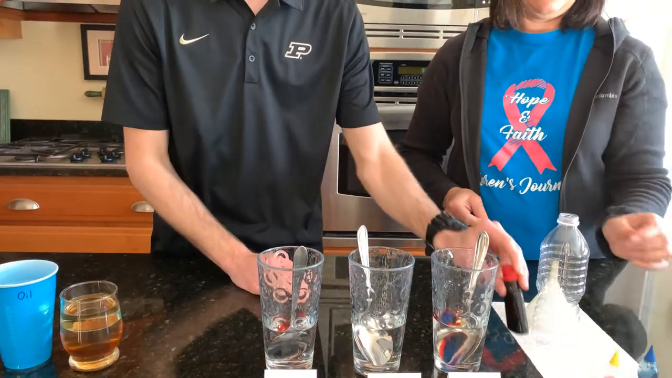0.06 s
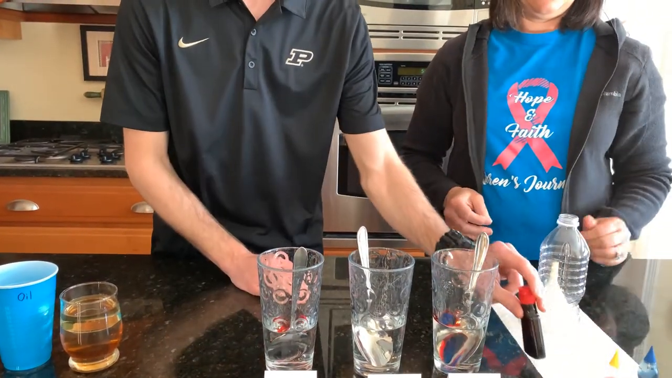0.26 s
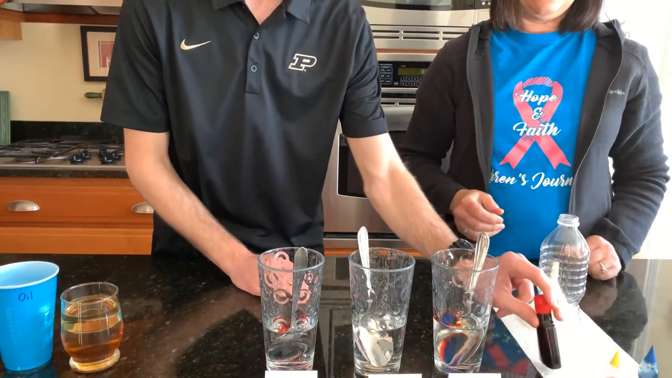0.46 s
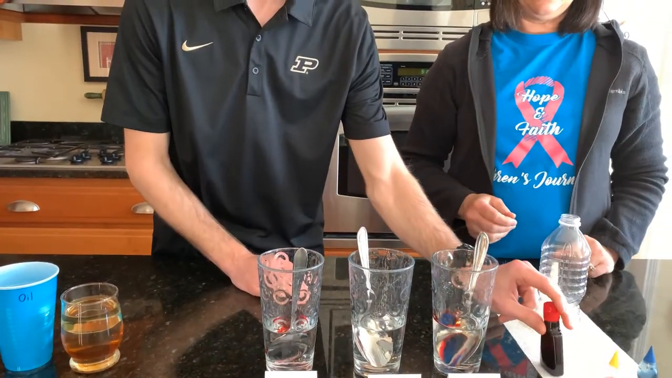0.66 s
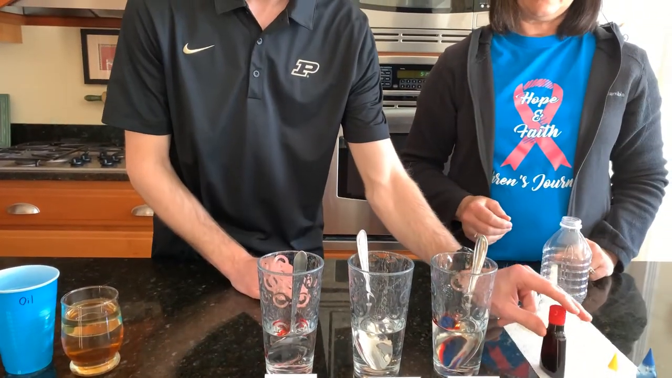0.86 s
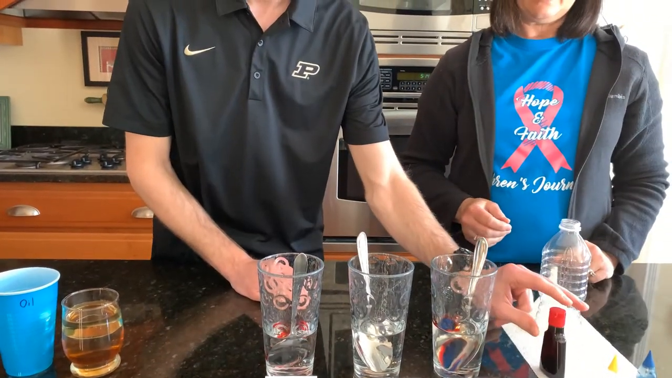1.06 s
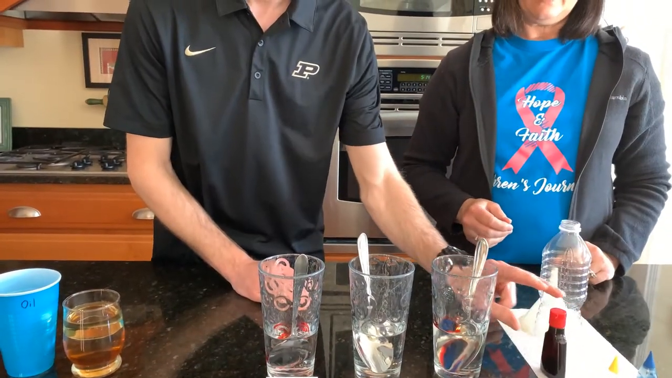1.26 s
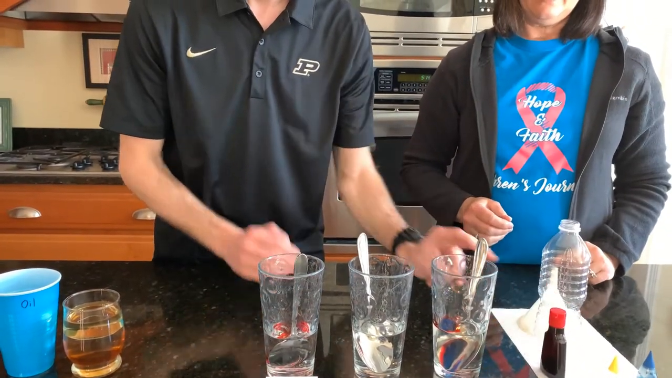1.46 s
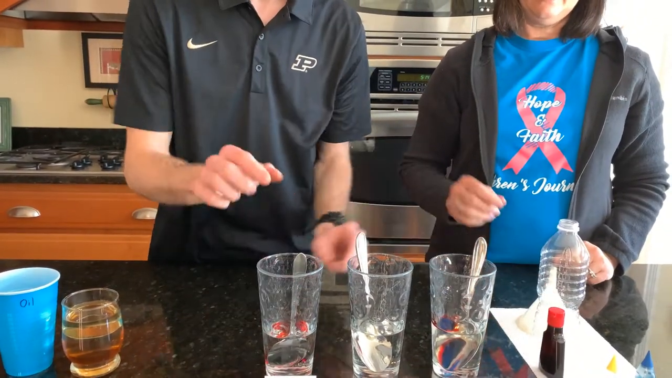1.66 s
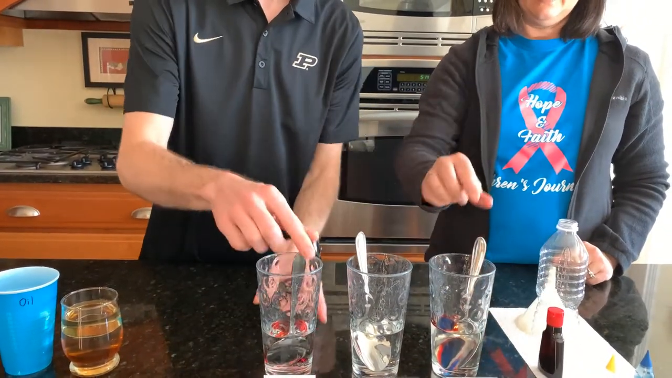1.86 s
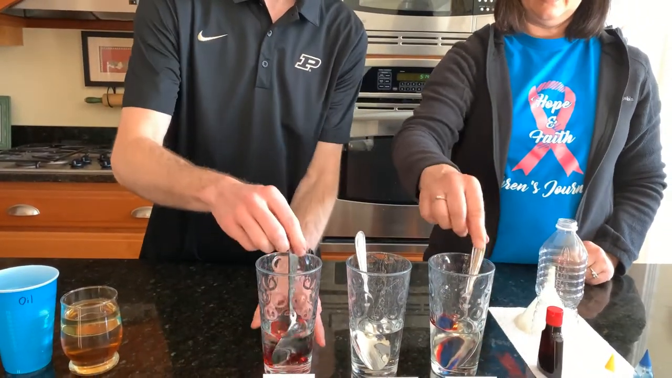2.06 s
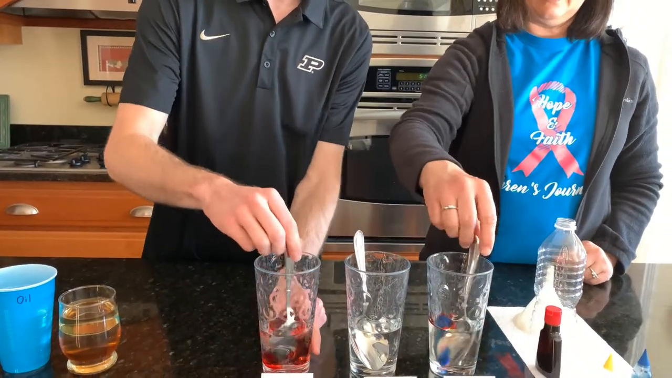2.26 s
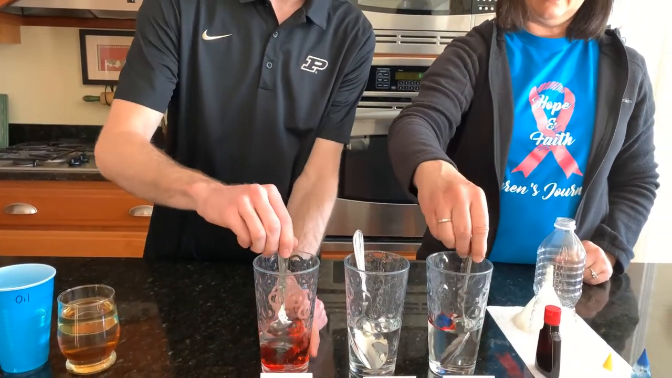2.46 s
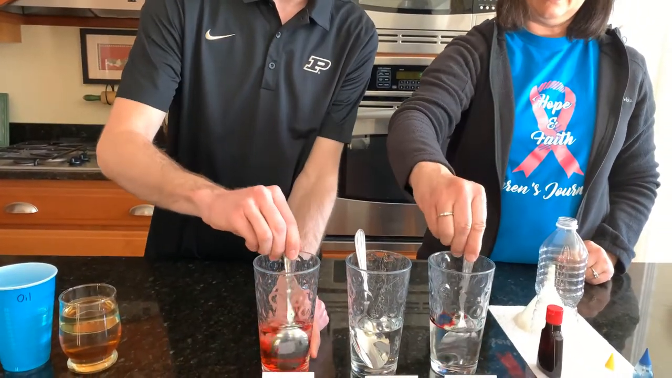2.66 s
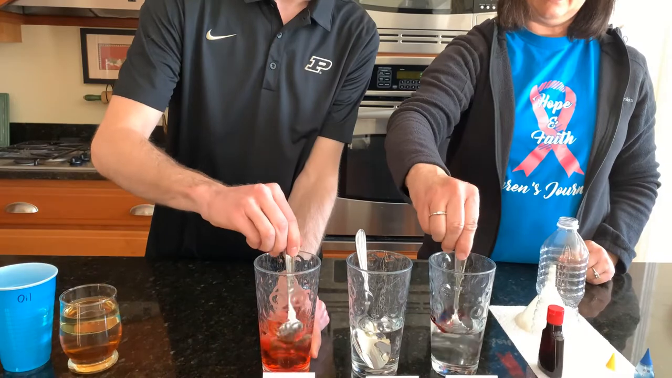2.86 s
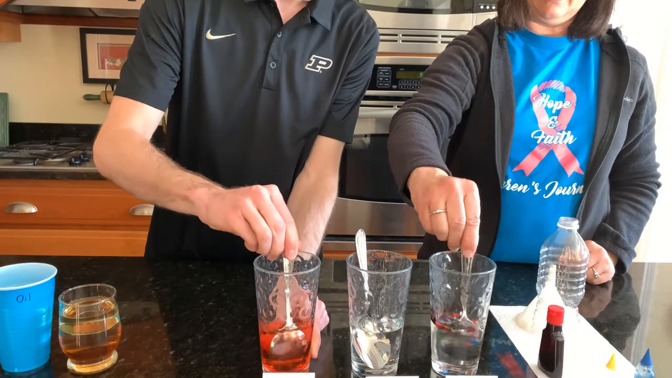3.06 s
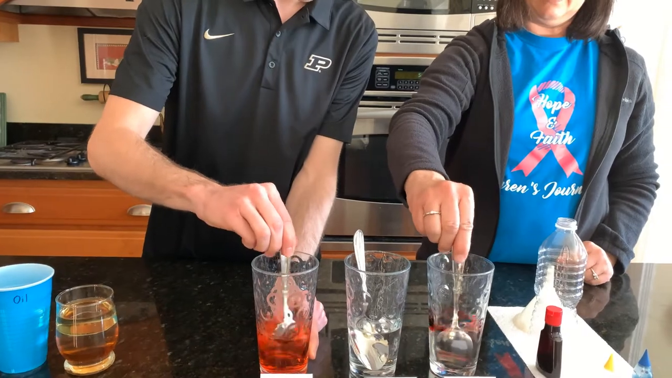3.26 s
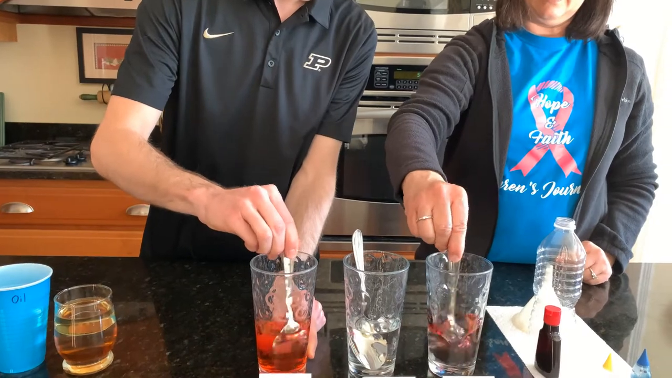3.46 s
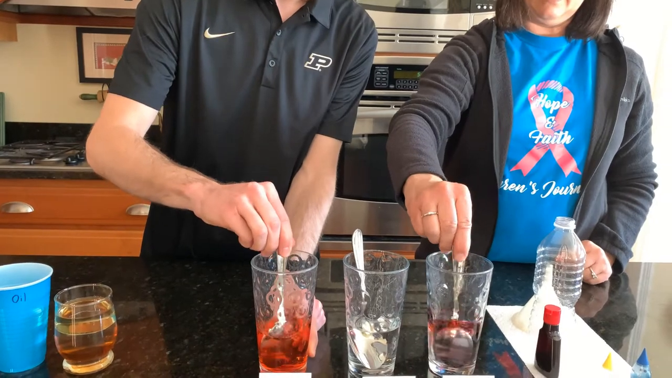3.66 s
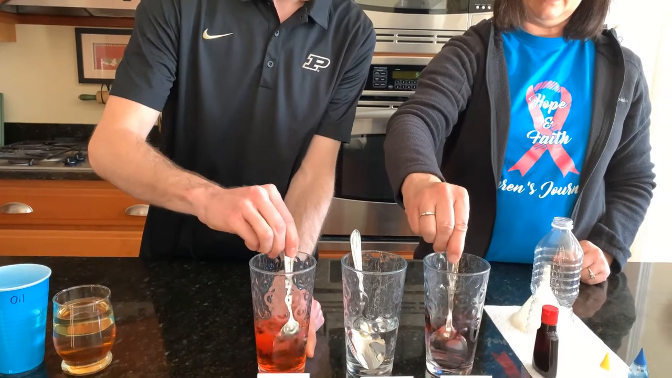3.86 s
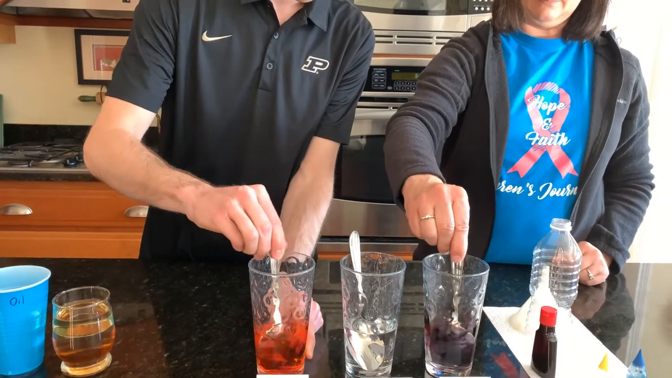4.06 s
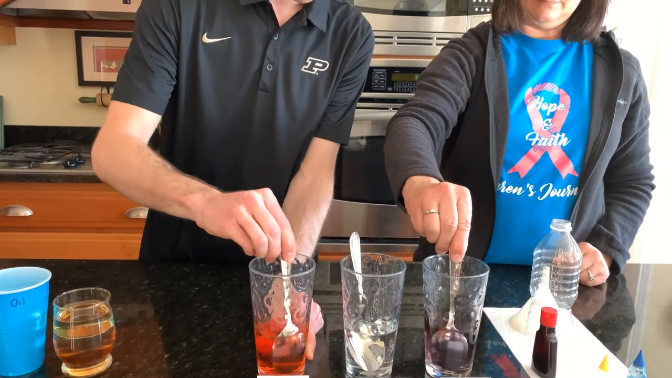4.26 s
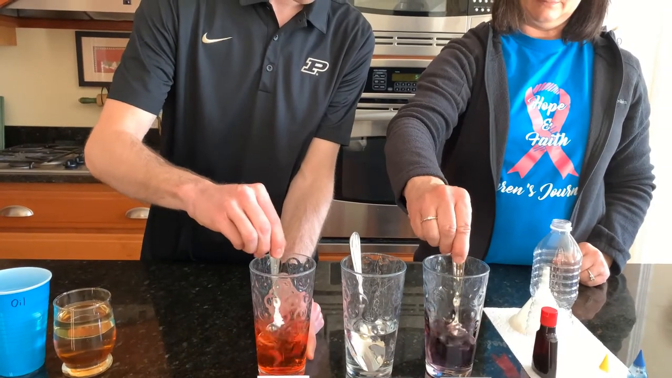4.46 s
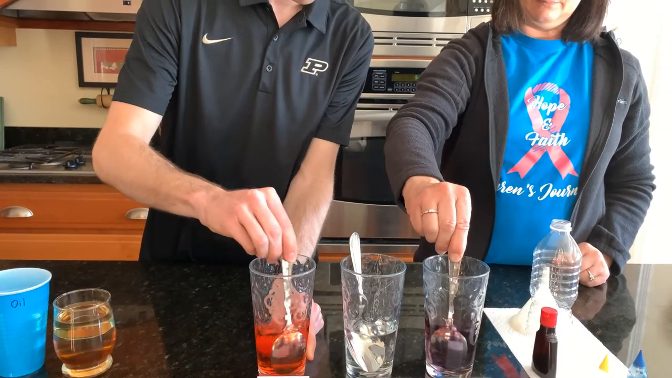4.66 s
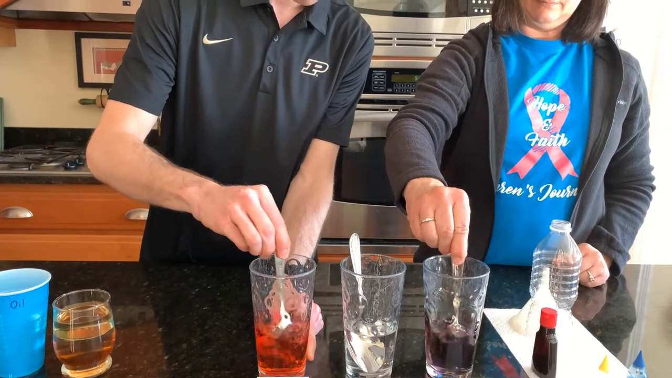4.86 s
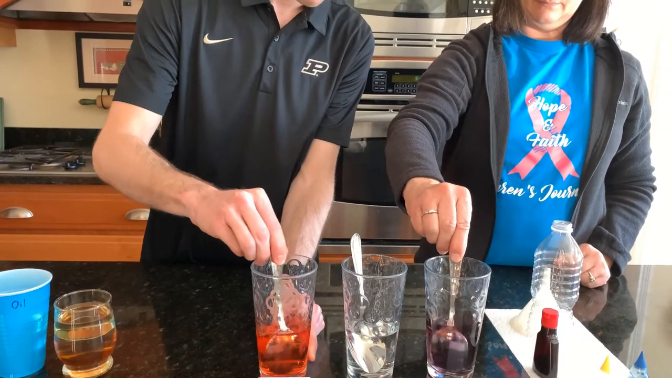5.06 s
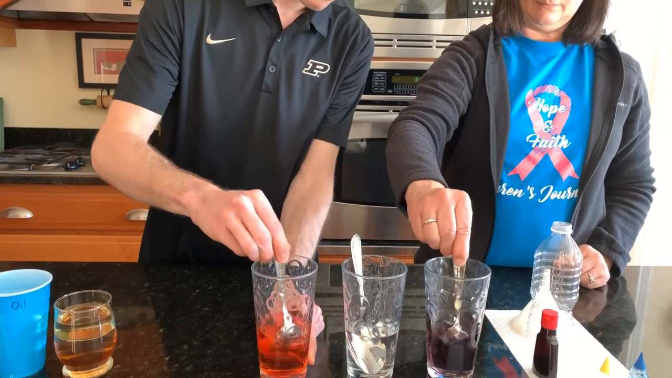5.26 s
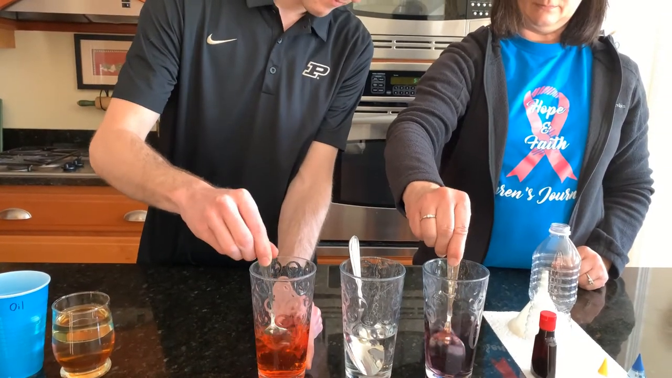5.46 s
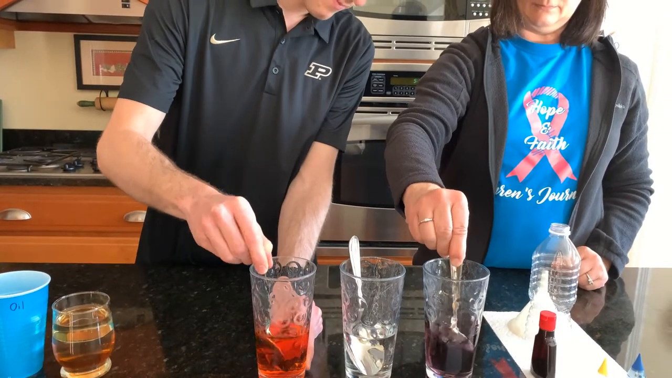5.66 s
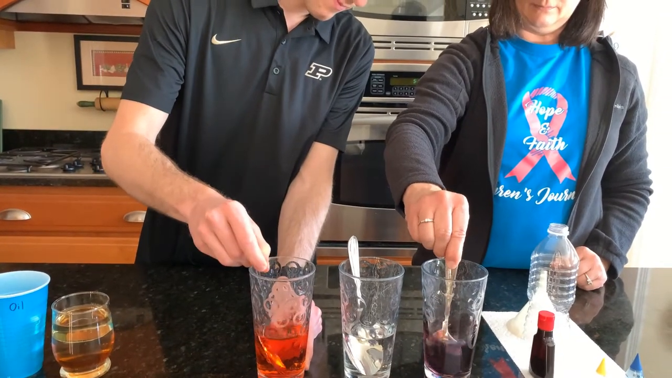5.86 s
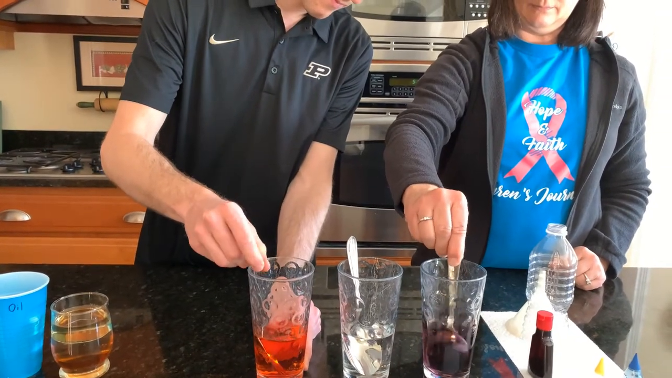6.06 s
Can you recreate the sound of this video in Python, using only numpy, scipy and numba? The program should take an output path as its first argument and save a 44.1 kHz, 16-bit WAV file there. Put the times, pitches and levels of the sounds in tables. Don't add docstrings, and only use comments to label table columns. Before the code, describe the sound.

Quiet room tone first, with slight cloth and plastic rustling. Then spoons begin tapping in two thick drinking glasses: a medium clink, a few lighter ones, then hard ringing knocks at quickening intervals with irregular grazes. Each is crisp and glassy with a short rattle and a faint singing spoon handle. Water swirls and gurgles underneath. Indoors at a kitchen counter, recorded about a metre away, continuing to the end.

```python
import sys
import numpy as np
from scipy import signal
from scipy.fft import rfft, irfft, next_fast_len
from scipy.io import wavfile
from scipy.ndimage import uniform_filter1d
from numba import njit

SR = 44100
rng = np.random.default_rng(int(sys.argv[2]) if len(sys.argv) > 2 else 0)


def int16_out(signal):
    q = np.round(np.clip(np.atleast_2d(signal).T, -1, 1) * 32767)
    wavfile.write(sys.argv[1], SR, q.astype(np.int16))


def attenuation_scalar(level_db):
    decades = np.asarray(level_db, float) / 20
    return 10 ** decades


N = 270009

# [s, dB, dB, Hz, dB]
BLOWS = [(2.3629, -21, -33, 10300, -38), (3.0081, -10, -22.5, 9580, -55), (3.5906, -9, -20.5, 9630, -28),
         (4.0862, -8, -25.5, 9630, -22), (4.5333, -9, -17.5, 9740, -25.5), (4.9267, -8, -22.5, 10300, -39),
         (5.3273, -12, -23, 9610, -18.5), (5.6889, -9.5, -26.5, 10300, -26.5),
         (6.052, -13, -29, 10300, -27)]
# [s, dB, Hz, dB, dB]
GRAZES = [(2.9371, -41.5, 4765, -38.5, -52), (3.2936, -36.5, 4620, -20.5, -35), (3.84, -41, 4560, -40, -60),
          (4.2683, -31.5, 4490, -25.5, -33.5), (4.2941, -25.5, 4740, -25, -29.5),
          (4.4284, -32, 4760, -35, -51), (4.7013, -33, 4490, -30.5, -31),
          (4.743, -25.5, 4680, -26.5, -30.5), (5.1575, -42, 4520, -30.5, -62), (5.227, -35, 4690, -34, -27),
          (5.4919, -30, 4500, -29, -36.5), (5.5572, -36.5, 4590, -37, -40.5),
          (5.7776, -28, 4650, -31, -32.5), (5.8375, -25, 4576, -22.5, -26),
          (5.9468, -31.5, 4720, -37.5, -41)]
# [s, dB, Hz, dB, dB]
TAPS = [(2.4774, -15, 4855, -17, -44.5), (2.6774, -42.5, 4920, -53, -62.5),
        (2.7609, -26, 4768, -26.5, -49.5), (2.9987, -20.5, 4800, -34, -54),
        (3.1949, -25, 4814, -29.5, -50.5), (3.3879, -22, 4890, -24.5, -43.5),
        (3.4196, -33, 4890, -44, -44.5), (3.5565, -30, 4825, -28, -62), (3.7286, -17.5, 4810, -21, -40.5),
        (3.7774, -34, 4870, -34, -43), (3.913, -25, 4790, -24.5, -40.5), (4.0867, -17.5, 4860, -46, -40.5),
        (4.5344, -17, 4867, -40, -41), (4.8505, -32.5, 4780, -40, -53), (4.9921, -19.5, 4804, -12, -53),
        (5.105, -28.5, 4754, -21, -51.5), (5.4465, -14.5, 4800, -30, -41), (6.0063, -30, 4870, -36, -63)]
# [Hz, dB, s]
NEAR_GLASS_MODES = [
    [(4332, -26, .3), (4553, -16, .12), (4834, -16, .1), (5260, -15, .033), (4712, -17, .28),
     (4270, -14, .017)],
    [(7520, -9, .06), (7602, -5, .12), (7280, -12, .073), (7830, -19.5, .066), (8390, -15, .1)],
    [(9628, -3.5, .1), (9840, -8, .04), (10295, -4, .08), (10530, -7, .15), (10900, -10, .058),
     (11330, -8, .06)],
    [(11950, -2.5, .12), (12330, -7, .12), (12710, -7, .12), (15130, 3, .09), (14220, 3, .1),
     (15400, -5, .099)],
]
FAR_GLASS_MODES = [
    [(4100, -33, 0.11), (4940, -16, 0.088), (4570, -28, .18), (5400, -20.5, 0.036), (3130, -18.5, 0.074)],
    [(7350, -4, 0.084), (6750, -18.5, 0.23), (7710, -20.5, 0.081), (7415, -1, 0.13), (8610, -20, 0.14)],
    [(9316, -14, .027), (9900, -8, .038), (9445, -10, .06), (10550, -8, .12), (11030, -12, .04),
     (11330, -18, .061)],
    [(13200, 0, 0.023), (12900, 0.5, 0.046), (14280, -11, .1), (14550, -12, 0.12), (14970, -1, 0.068),
     (15550, -8, .1)],
]
WALL_T60_S = [0.086, 0.045, 0.03]
# [Hz, s]
HANDLE_MODE = (1889, 0.5)
BOWL_MODE = (2385, 0.05)
# [s, dB, s]
FREE_RINGS = [(2.3623, -16, 0.02), (3.01, -24, .04), (4.0864, -18.5, 0.042), (4.924, -16.5, 0.047),
              (5.3252, -12, 0.036), (5.6917, -13, 0.044), (6.0513, -22, 0.03)]
# [Hz, dB per Hz]
CRACK_SPECTRUM = [(200, -42), (700, 6.5), (1500, 1), (2500, -1.5), (3500, -3.5), (4700, 0.5), (6300, -1.5),
                  (7500, -10), (8800, -4.5), (10300, 4.5), (12200, -4), (13400, -21), (14800, -0.5),
                  (16500, -43)]
# [s, dB, Hz]
THUDS = [(2.363, -43, 846), (2.477, -33, 864), (2.677, -41, 920), (2.761, -39.5, 696), (2.935, -36.5, 698),
         (3.011, -34, 860), (3.295, -32.5, 786), (3.39, -32, 727), (3.421, -36.5, 730), (3.557, -30.5, 825),
         (3.592, -20.5, 705), (3.73, -30.5, 875), (3.843, -36, 742), (3.912, -30.5, 1060),
         (4.088, -28, 650), (4.271, -44, 790), (4.431, -30, 720), (4.704, -33, 914), (4.742, -38, 754),
         (4.85, -29, 717), (4.927, -42, 677), (4.993, -40, 890), (5.23, -38, 1120), (5.327, -30.5, 1210),
         (5.446, -51, 865), (5.493, -38, 866), (5.69, -28, 719), (5.84, -50, 803), (5.947, -30, 719),
         (6.052, -30.5, 715)]
# [s, dB, Hz, s]
GULPS = [(3.696, -42, 856, 0.11), (4.049, -40.5, 780, .053), (4.508, -23.5, 857, 0.11),
         (5.263, -28, 700, 0.035), (5.515, -35, 898, 0.045)]
# [s, dB]
STIRRING = [(2.34, -63), (2.409, -79), (2.53, -69), (2.59, -54.5), (2.77, -55.5), (3.17, -52),
            (3.34, -56.5), (3.79, -49), (4.14, -57.5), (4.35, -51), (4.89, -49.5), (5.05, -71), (5.26, -41),
            (5.4, -49.5), (5.52, -57.5), (5.79, -52), (5.89, -49.5), (6.12, -48.5)]
# [Hz, dB]
SLOSH_BANDS = [(330, -2), (650, 1.0), (1150, 7), (1900, 2.5), (3200, -3), (5500, -2.5)]
# [Hz, s]
ROOM_T60_S = [(500, 0.28), (1300, 0.32), (3200, 0.34), (6500, 0.21), (12500, 0.12)]
# [Hz, dB]
DIFFUSE_SPECTRUM = [(200, 0), (3100, 0), (3550, -12), (4000, 0), (5550, 0), (5850, -26), (6550, -26),
                    (6850, 0), (8450, 0), (8900, -22), (9300, 0), (12500, -3), (13200, -28), (14000, 0)]
# [s, s, Hz, Hz, dB]
RUSTLES = [(.73, .06, 3600, 700, -84), (.725, .06, 6500, 1800, -80), (.73, .06, 9800, 900, -81),
           (.845, .03, 1700, 400, -79), (1.281, .055, 1000, 500, -66), (1.8, .39, 2400, 500, -86),
           (1.852, .24, 10500, 2000, -83), (.905, .002, 12500, 6000, -70), (4.51, .01, 8000, 13000, -52),
           (4.255, .03, 11500, 2500, -60), (4.765, .07, 4100, 500, -50), (4.76, .06, 3000, 400, -53),
           (5.842, .025, 2900, 700, -44)]
# [Hz, dB per Hz]
HUM_SPECTRUM = [(25, -16), (48, -7.5), (90, -9.5), (250, -8.5), (500, -19), (800, -26.5), (1500, -36.5),
                (4000, -41), (7800, -39.5), (8700, -41), (10800, -37.5), (12800, -46), (13500, -68),
                (15500, -61)]
# [Hz, Hz, dB, dB]
FRIDGE_TONES = [(119, 8.9, -67, -1), (145.1, 8.8, -66, 4.5), (597.4, 11.6, -80.5, 1.2)]

BLOW_HZ, BLOW_SECOND_HZ, BLOW_SECOND_DB, BLOW_PAN_DB = 4701, 7440, -22, -4
BLOW_HANDLE_DB, LOOSEN_DB_PER_S = -43.5, 1.5
GRAZE_SECOND_HZ, GRAZE_THIRD_HZ = 7230, 10530
GRAZE_HANDLE_DB, GRAZE_BOWL_DB, GRAZE_PAN_DB = -54.5, -47.5, -2.5
TAP_SECOND_HZ, TAP_THIRD_HZ = 7660, 9733
TAP_SECOND_DROP_DB, TAP_BOWL_DROP_DB, TAP_PAN_DB = -6.5, -29.5, -1.5
PLACE_SPREAD, PLACE_PAN_DB = .015, 2.1
TOP_SLOPE, TOP_DB = 0.81, -17.5
THUD_T60_S, THUD_LONGER_S_PER_DB = .05, .0004
FREE_T60_S, CHOKE_S = .3, .02
ROOM_DB, HUM_DB = -7, -64


def contacts():
    hits = []
    for start_s, wall_db, third_db, third_hz, bowl_db in BLOWS:
        handle_db = BLOW_HANDLE_DB + LOOSEN_DB_PER_S * (start_s - BLOWS[0][0])
        hits.append(dict(s=start_s, hz=[BLOW_HZ, BLOW_SECOND_HZ, third_hz],
                         db=[wall_db, BLOW_SECOND_DB, third_db],
                         handle=handle_db, bowl=bowl_db, pan=BLOW_PAN_DB, glass=NEAR_GLASS_MODES))
    place = rng.standard_normal((len(GRAZES + TAPS), 3))
    for (start_s, wall_db, wall_hz, second_db, third_db), c in zip(GRAZES, place):
        second_hz = GRAZE_SECOND_HZ * (1 + PLACE_SPREAD * c[0])
        third_hz = GRAZE_THIRD_HZ * (1 + 2 * PLACE_SPREAD * c[1])
        hits.append(dict(s=start_s, hz=[wall_hz, second_hz, third_hz], db=[wall_db, second_db, third_db],
                         handle=GRAZE_HANDLE_DB, bowl=GRAZE_BOWL_DB,
                         pan=GRAZE_PAN_DB + PLACE_PAN_DB * c[2], glass=NEAR_GLASS_MODES))
    for (start_s, wall_db, wall_hz, third_db, handle_db), c in zip(TAPS, place[len(GRAZES):]):
        hits.append(dict(s=start_s, hz=[wall_hz, TAP_SECOND_HZ, TAP_THIRD_HZ],
                         db=[wall_db, wall_db + TAP_SECOND_DROP_DB, third_db],
                         handle=handle_db, bowl=wall_db + TAP_BOWL_DROP_DB,
                         pan=TAP_PAN_DB + PLACE_PAN_DB * c[2], glass=FAR_GLASS_MODES))
    for hit in hits:
        hit["db"].append(TOP_DB + TOP_SLOPE * hit["db"][2])
    return sorted(hits, key=lambda hit: hit["s"])


def glass_walls(hits, scatter_db=4.0, detune=0.0011, port_lag_s=2.8e-5, lead_spread=1.0,
                burst_db=-6, burst_t60_s=0.07):
    rows = []
    for hit in hits:
        main_hz = hit["hz"]
        band_db = np.array(hit["db"]) + [-3.5, -2.5, 1.5, 4.0]
        modes = list(zip(main_hz, band_db, WALL_T60_S))
        modes.append((BOWL_MODE[0], hit["bowl"] + 3.0, BOWL_MODE[1]))
        modes += [(hz, db + burst_db, burst_t60_s) for hz, db in zip(main_hz, band_db)]
        for top_db, group in zip(band_db, hit["glass"]):
            for hz, db, t60_s in group:
                already_db = -25 * (20 < abs(hz - main_hz[0]) < 70)
                modes.append((hz, top_db + db + already_db, t60_s))
        chance = rng.standard_normal((len(modes), 3))
        chance[:7, :2] = chance[0, 2] = 0
        chance[4:7, 2] = chance[:3, 2]
        for (hz, db, t60_s), c in zip(modes, chance):
            lead = 2 * np.pi * hz * port_lag_s + lead_spread * c[2]
            rows.append((hit["s"], hz * (1 + detune * c[0]), t60_s, attenuation_scalar(db + scatter_db * c[1]),
                         attenuation_scalar(hit["pan"] / 4), lead))
    return ring(np.array(rows), 0.00042)


def free_ring(lead=0.76):
    rows = [(start_s, BLOW_HZ, FREE_T60_S, attenuation_scalar(level_db), attenuation_scalar(BLOW_PAN_DB / 4), lead)
            for start_s, level_db, _ in FREE_RINGS]
    t = np.arange(N) / SR
    gate = sum((t >= start_s) * (t < start_s + length_s) for start_s, _, length_s in FREE_RINGS)
    k = int(CHOKE_S * SR)
    choke = uniform_filter1d(1. * gate, k, origin=k // 2 - 1)
    return ring(np.array(rows), 0.00088) * np.maximum(gate, choke)


def cracks(hits, crack_db=-7, fast_s=0.0043, rattle_s=0.049):
    blows = np.zeros(N)
    for hit in hits:
        blows[int(hit["s"] * SR)] = attenuation_scalar(np.dot([0.2, 0.52, 0.16, 0.04], hit["db"]) + crack_db)
    blows = uniform_filter1d(blows, size=40, origin=-20)

    def fade(tau_s):
        return signal.lfilter([1], [1, -np.exp(-1 / (tau_s * SR))], blows)

    noise = level(colour(pair(0.42), CRACK_SPECTRUM), 0)
    rattle = colour(noise, DIFFUSE_SPECTRUM) * attenuation_scalar(-14.0 + 5.9 * walk(70)) * fade(rattle_s)
    return noise * fade(fast_s) + rattle


def base_thuds(over_db=-11):
    thuds = list(GULPS)
    for start_s, peak_db, pitch_hz in THUDS:
        thuds.append((start_s, peak_db, pitch_hz, THUD_T60_S - THUD_LONGER_S_PER_DB * (peak_db + 21.5)))
    chance = rng.standard_normal((len(thuds), 3))
    rows = []
    for (start_s, peak_db, pitch_hz, t60_s), c in zip(thuds, chance):
        partials = [(1, 0, 0.042), (0.519, over_db - 13, c[0]), (1.1, over_db, c[1]), (1.75, over_db + 1.5, c[2])]
        for ratio, rel_db, a in partials:
            gain = attenuation_scalar(peak_db + 4.0 + rel_db * t60_s / 0.068)
            rows.append((start_s, pitch_hz * ratio * (1 + 0.066 * a), np.clip(t60_s, .015, .3), gain,
                         1., 0.51 + 0.73 * a))
    return ring(np.array(rows), 0.0032)


def spoon_handle(hits, flutter_db=5.5, lead=1.0, grip_s=0.0031):
    start_s, level_db = np.transpose([(hit["s"], hit["handle"]) for hit in hits])
    pitch_hz, t60_s = HANDLE_MODE
    t = np.arange(N) / SR
    last = np.searchsorted(start_s, t) - 1
    decay_db = -60 * np.abs(t - start_s[last]) / t60_s
    fade = (last >= 0) * attenuation_scalar(level_db[last] + 7.5 + decay_db + flutter_db * walk(30))
    phase = 2 * np.pi * (pitch_hz * t + 0.22 * walk(6))
    return uniform_filter1d(fade, int(grip_s * SR)) * np.sin(phase + lead * np.array([[1], [0]]))


def gurgles(count=260, size_db=3, over_db=3.0, t60_s=0.044):
    effort_s, effort_db = np.transpose(STIRRING)
    when, pitch, size, lead = rng.random((count, 4)).T
    start_s = effort_s[0] + when * (effort_s[-1] - effort_s[0])
    gain = attenuation_scalar(np.interp(start_s, effort_s, effort_db) + over_db - size_db * np.log(size)) * attenuation_scalar(-12 * pitch)
    rows = [start_s, 330 * 11 ** pitch, t60_s * (1.5 - pitch), gain, np.ones(count), 0.86 * lead]
    return ring(np.transpose(rows), 0.0016)


def sloshing(grain_db=3.5):
    effort_s, effort_db = np.transpose(STIRRING)
    noise = pair(0.25)
    slosh = 0
    for pitch_hz, level_db in SLOSH_BANDS:
        flicker = attenuation_scalar(level_db + 5 * walk(25) + grain_db * walk(300))
        slosh = slosh + flicker * band(noise, pitch_hz, 0.63 * pitch_hz)
    return level(slosh, 1.8) * attenuation_scalar(np.interp(np.arange(N) / SR, effort_s, effort_db, left=-150))


def room(x, gap_s=0.0023):
    t = np.arange(SR // 2) / SR
    noise = pair(0.12)[:, :len(t)]
    tail = sum(band(noise, hz, hz) * attenuation_scalar(-60 * t / t60_s) for hz, t60_s in ROOM_T60_S)
    tail = tail * (1 - np.exp(-t / gap_s))
    return signal.fftconvolve(x, tail / np.sqrt(np.sum(tail ** 2) / 2), axes=1)[:, :N]


def rustles():
    t, noise = np.arange(N) / SR, pair(0.75)
    out = 0
    for start_s, length_s, pitch_hz, width_hz, level_db in RUSTLES:
        swell = np.exp(-((t - start_s) / length_s * 2) ** 2)
        out = out + level(band(noise, pitch_hz, width_hz), level_db) * swell
    return out


def kitchen():
    bass = signal.butter(1, 300, fs=SR)
    shared, apart = pair(1.0), pair(0.049)
    air = signal.lfilter(*bass, shared) + apart - signal.lfilter(*bass, apart)
    out = level(colour(air, HUM_SPECTRUM), HUM_DB)
    for pitch_hz, width_hz, level_db, waver_db in FRIDGE_TONES:
        tone = level(band(pair(0.88), pitch_hz, width_hz), level_db)
        out = out + tone * attenuation_scalar(waver_db * walk(11.0))
    return out


@njit
def ring(rows, rise_s):
    out = np.zeros((2, N))
    for s, hz, t60, gain, pan, lead in rows:
        step = np.exp(2j * np.pi * hz / SR - np.log(1000) / (t60 * SR))
        z, turn = gain + 0j, np.exp(1j * lead)
        onset, onset_step = 1., np.exp(-1 / (rise_s * SR))
        for i in range(int(s * SR), min(N, int((s + 1.2 * t60) * SR))):
            z, onset = z * step, onset * onset_step
            out[0, i] += (z * turn).imag * (1 - onset) * pan
            out[1, i] += z.imag * (1 - onset) / pan
    return out


def level(x, db):
    return x * attenuation_scalar(db) / np.sqrt(np.mean(x ** 2))


def colour(x, points):
    hz, db = np.transpose(points)
    size = next_fast_len(N)
    log_hz = np.log(np.linspace(1, SR / 2, size // 2 + 1))
    return irfft(rfft(x, size) * attenuation_scalar(np.interp(log_hz, np.log(hz), db)), size)[:, :N]


def band(x, hz, width_hz):
    edges = [hz - width_hz / 2, hz + width_hz / 2]
    return signal.sosfilt(signal.butter(2, edges, "band", fs=SR, output="sos"), x)


def pair(alike):
    mid, side = rng.standard_normal((2, N))
    alike = np.clip(alike, 0, 1)
    return np.sqrt(1 + alike) * mid + np.sqrt(1 - alike) * side * np.array([[1], [-1]])


def walk(rate_hz):
    k = int(SR / rate_hz)
    held = np.repeat(rng.standard_normal(N // k + 1), k)
    return uniform_filter1d(uniform_filter1d(held, k), k)[:N]


def scene():
    hits = contacts()
    near = glass_walls(hits) + free_ring() + cracks(hits) + base_thuds() + spoon_handle(hits) + gurgles()
    diffuse = attenuation_scalar(ROOM_DB) * room(near) + sloshing()
    return near + colour(diffuse, DIFFUSE_SPECTRUM) + rustles() + kitchen()


def band_limit(x):
    return signal.sosfilt(signal.butter(12, 16970, fs=SR, output="sos"), x)


def record(dry):
    mix = np.clip(dry, -1, 1)
    return band_limit(mix)


dry = scene()
out = record(dry)
int16_out(out)
```